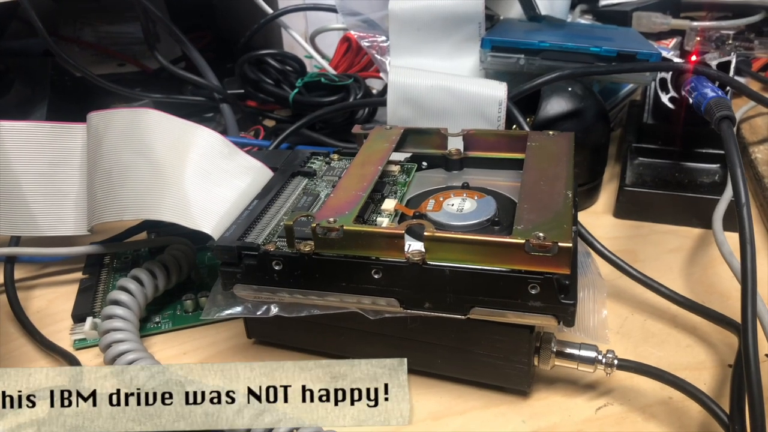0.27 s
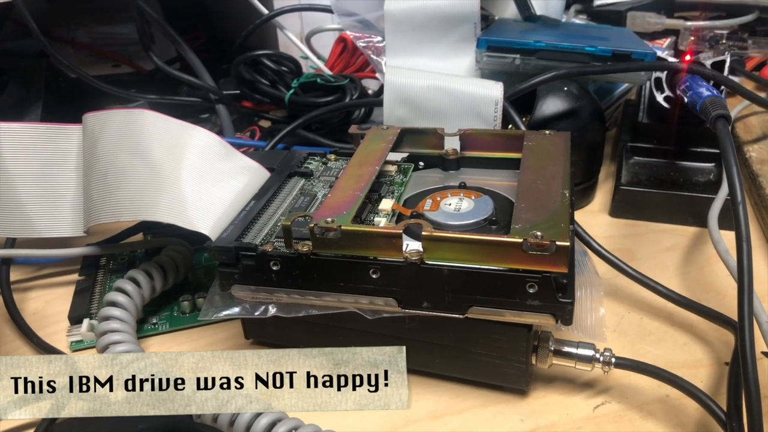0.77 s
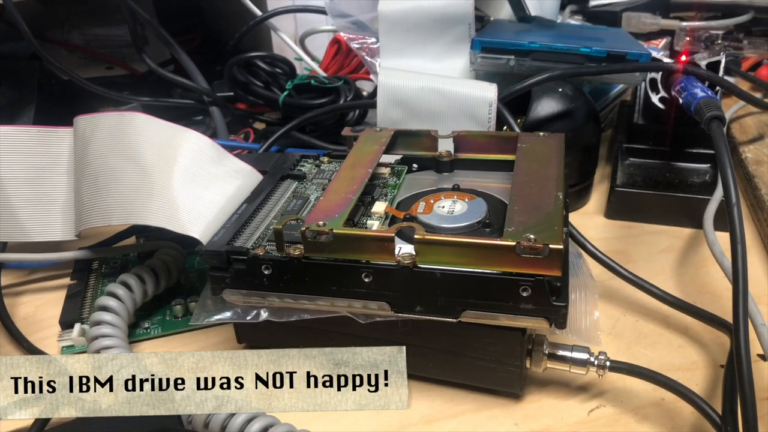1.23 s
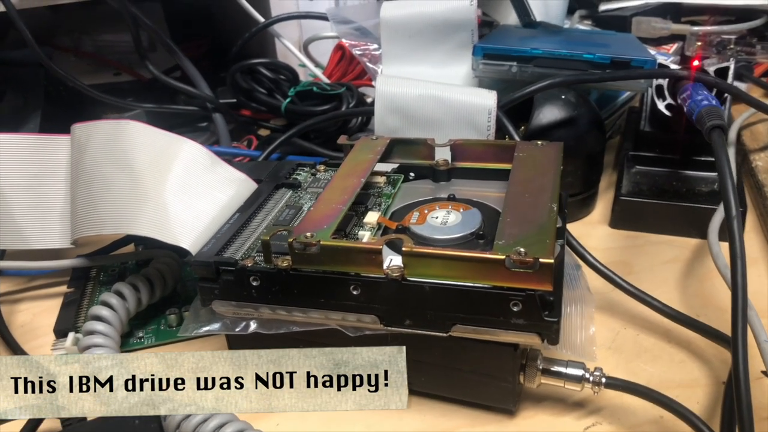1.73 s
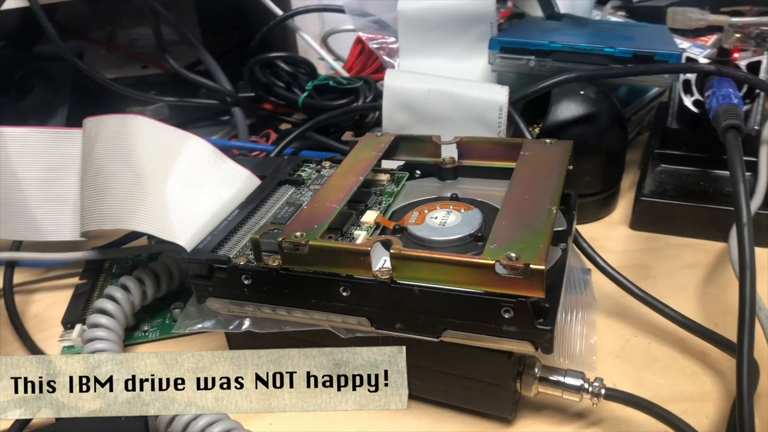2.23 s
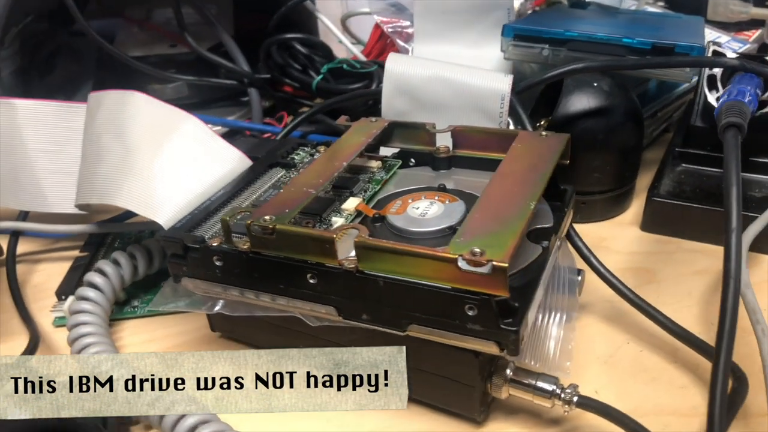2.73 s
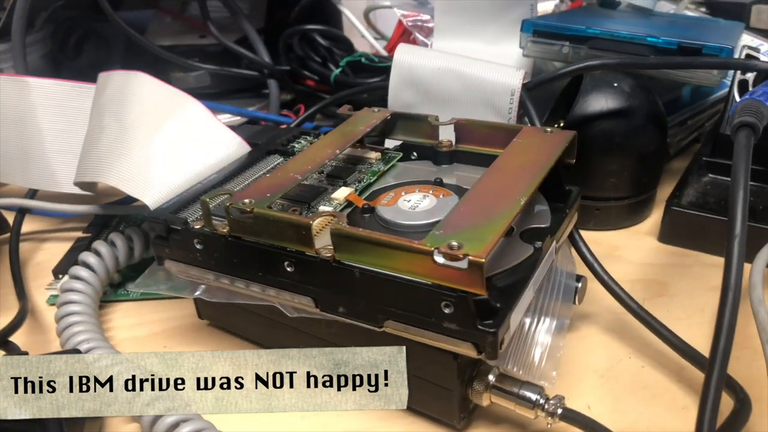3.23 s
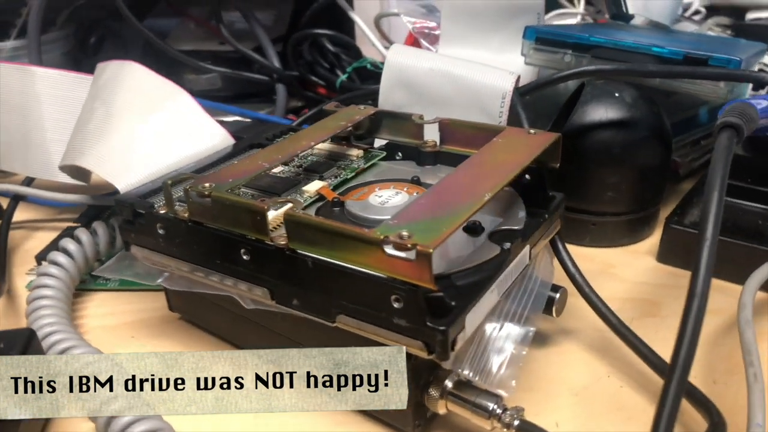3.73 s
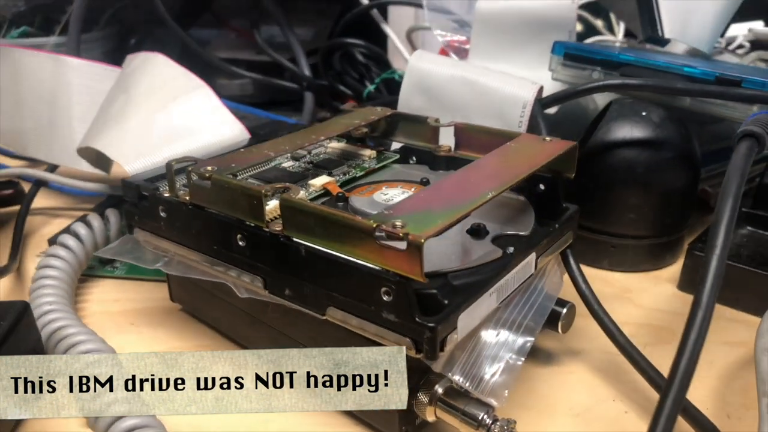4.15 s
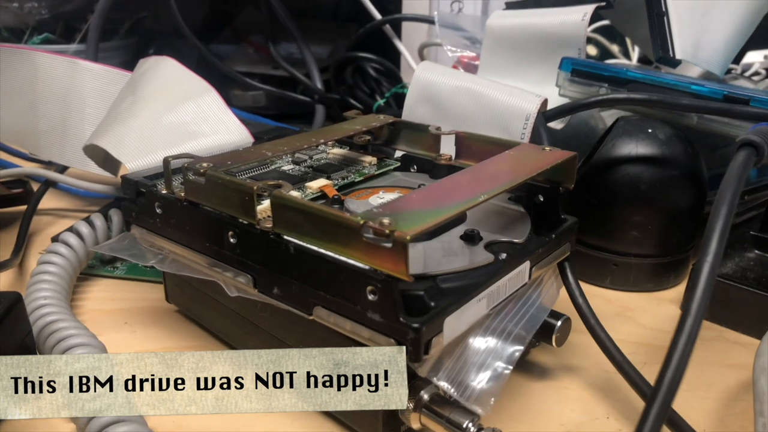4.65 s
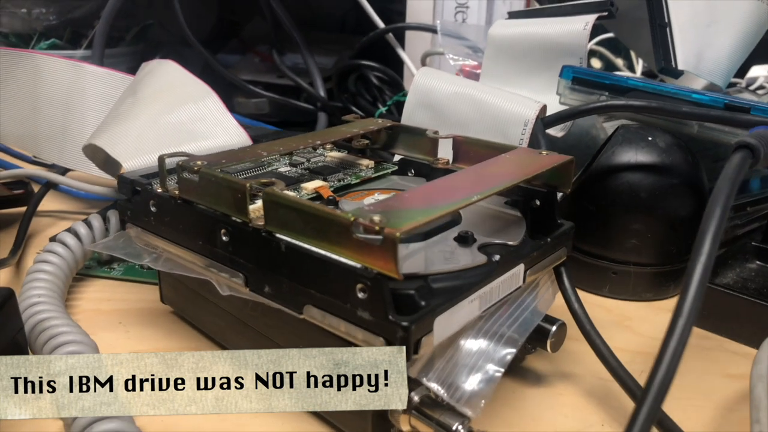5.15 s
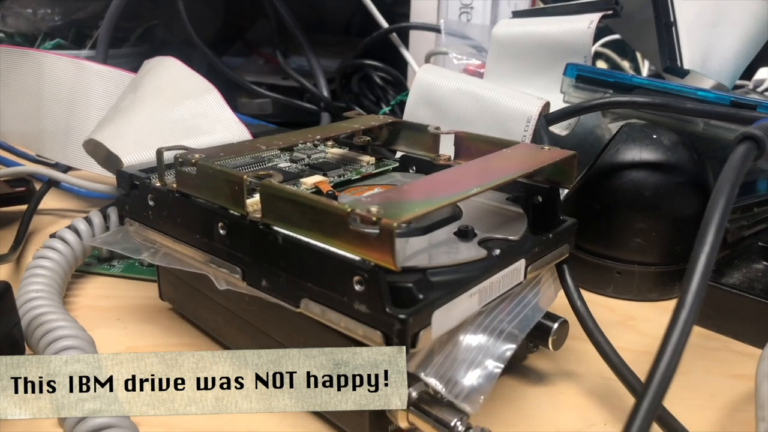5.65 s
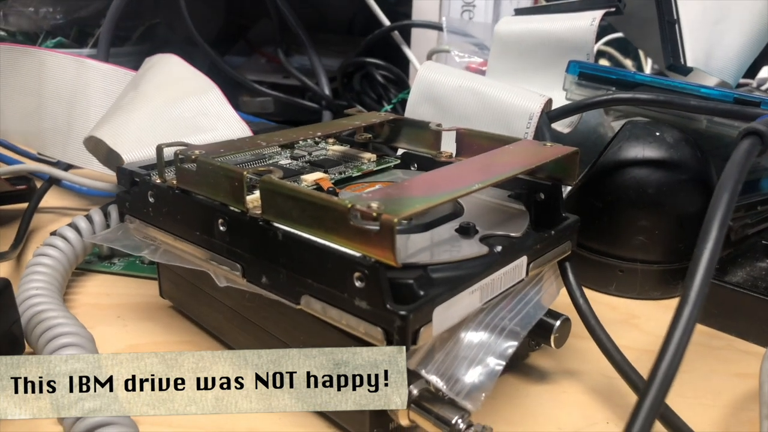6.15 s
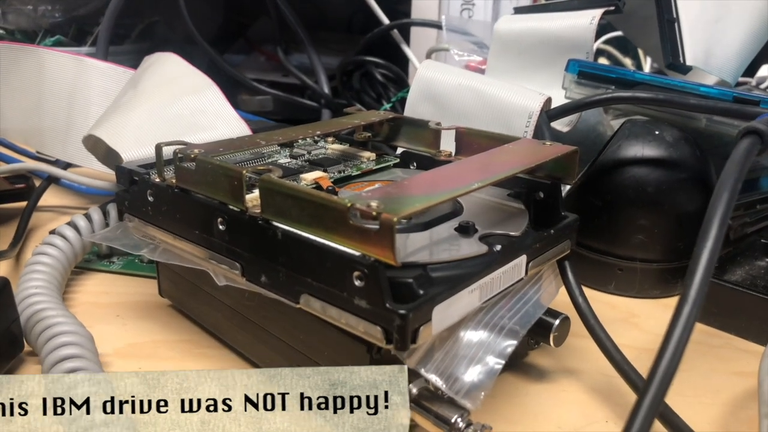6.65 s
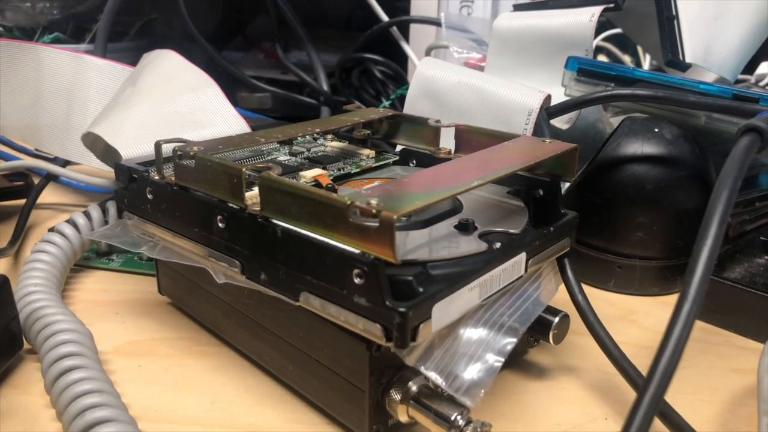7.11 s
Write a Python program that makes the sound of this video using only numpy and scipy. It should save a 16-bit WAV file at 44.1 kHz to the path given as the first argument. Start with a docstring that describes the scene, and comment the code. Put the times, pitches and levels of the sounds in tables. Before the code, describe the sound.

A faulty, uncovered hard drive runs close to the microphone on a bench in a small room with little echo. A thin spindle whine and airy platter whirr continue for the whole seven and a half seconds, the whine strongest at first and shifting in tone as the microphone moves. Over this, the head arm buzzes in short, irregular bursts that faintly ring the metal frame. It hits its stop with hard, bright clacks at about 0.2, 0.4, 1.5 and 4.3 seconds, and with softer, bouncing clicks roughly every 0.6 to 0.8 seconds elsewhere. The head also scrapes the platter in brief gritty hisses, often ending in sharp ticks, clearest at the very start and near 1.4, 2.5, 4.5, 5.2, 5.8 and 6.4 seconds. The buzzing turns slightly duller after about 3.3 seconds, and the uneven rattling carries on to the end.

```python
"""The head arm of a failing hard drive buzzes through bursts of short seeks, driven by its coil, and
slams against its stop and bounces, over and over. The head scrapes and chips at the platter; arm, head
and bearings shake the metal frame. Behind them the spindle whines and the platters whirr in the air.
The cover is off, the drive sits on a cluttered bench in a small room, the microphone moves close by."""
import sys
import numpy as np
from scipy import signal
from scipy.fft import rfft, irfft, next_fast_len
from scipy.io import wavfile
from scipy.ndimage import uniform_filter1d

SR = 44100
rng = np.random.default_rng(int(sys.argv[2]) if len(sys.argv) > 2 else 0)


def log_audio(samples):
    """Write samples as a 16-bit WAV file to the path given in sys.argv[1]."""
    # one column per channel
    frames = np.atleast_2d(samples).T
    # limit to full scale, then quantise
    limited = np.clip(frames, -1, 1)
    pcm = np.round(limited * 32767).astype(np.int16)
    wavfile.write(sys.argv[1], SR, pcm)


N = 325325
TIME_S = np.arange(N) / SR

# runs of short seeks: start_s, length_s, level_db, upper_modes_db, shake_db
SEEK_RUNS = [(0.032, 0.08, -34.5, -0.5, -33.5), (0.549, 0.11, -35, 3.5, -30.5),
             (0.671, 0.055, -31.5, 3.5, -32.5), (0.748, 0.022, -28, -0.5, -31),
             (1.056, 0.01, -40, -13, -39), (1.085, 0.055, -31, -6, -31.5), (1.216, 0.055, -30.5, -1.5, -37),
             (1.283, 0.145, -31.5, 1, -31), (1.712, 0.01, -34.5, 1, -40), (1.856, 0.02, -34, 3, -32.5),
             (1.9, 0.05, -34, 2, -37), (1.97, 0.055, -43, 3, -44), (2.032, 0.01, -34.5, 1, -38),
             (2.343, 0.022, -32, -13, -33), (2.503, 0.18, -36.5, 4.5, -37.5), (2.96, 0.02, -40, -14, -32),
             (3.032, 0.02, -37, -10, -38), (3.102, 0.078, -28.5, -2, -36.5), (3.194, 0.033, -34, 0, -30.5),
             (3.244, 0.01, -35, -8, -44), (3.265, 0.03, -33.5, -14, -32.5), (3.626, 0.044, -35, -12, -37),
             (3.727, 0.088, -31, -16, -36), (3.837, 0.078, -36.5, -9, -40.5),
             (4.374, 0.01, -31.5, -24, -35), (4.394, 0.02, -35.5, -20, -34.5),
             (4.467, 0.033, -36, -18, -34), (4.5055, 0.044, -27.5, -17, -31),
             (4.558, 0.033, -34.5, -13, -42), (4.592, 0.055, -31.5, -16, -35.5),
             (4.668, 0.033, -33.5, -14, -37.5), (4.974, 0.022, -32.5, -20, -33),
             (5.025, 0.02, -37, -18, -35.5), (5.114, 0.165, -33, -15, -36), (5.301, 0.01, -31.5, -13, -41),
             (5.602, 0.022, -35.5, -19, -34), (5.671, 0.01, -38, -17, -38), (5.744, 0.185, -32.5, -12, -39),
             (6.19, 0.01, -31, -22, -36), (6.212, 0.01, -33, -24, -36), (6.24, 0.01, -35, -22, -33),
             (6.267, 0.01, -34.5, -22, -33), (6.359, 0.19, -34.5, -9, -38.5), (6.919, 0.01, -36, -17, -32),
             (6.953, 0.01, -31, -19, -32), (6.985, 0.088, -31.5, -9, -38.5),
             (7.106, 0.033, -29.5, -15, -34)]
# single hard throws of the arm: start_s, length_s, level_db
ARM_JOLTS = [(0.4176, 0.0048, -24.5), (0.722, 0.0051, -29), (1.064, 0.0096, -22), (1.691, 0.0061, -26.5),
             (2.336, 0.0036, -24.5), (2.9466, 0.0087, -22.5), (3.5747, 0.0083, -27.5),
             (3.5983, 0.0032, -27.5), (3.7184, 0.0025, -25), (3.9227, 0.006, -29), (4.336, 0.0072, -27.5),
             (4.6275, 0.0051, -27), (4.962, 0.013, -29), (5.004, 0.0033, -27.5), (5.136, 0.0059, -27),
             (5.5797, 0.0088, -28.5), (6.1983, 0.0072, -22.5), (6.805, 0.011, -29.5), (7.099, 0.006, -26)]
# blows on the stop: start_s, level_db, bounce_after_s
STOP_BLOWS = [(0.1655, -11.5, .01), (0.3669, -14.5, .01), (0.406, -22, .012), (0.87, -23, 0.012),
              (1.4862, -13, .01), (1.6232, -20.5, .011), (2.1332, -24.5, 0.011), (2.7812, -22, 0.0091),
              (3.5084, -20, 0.01), (4.3043, -11, .01), (4.8037, -22, .0086), (5.4296, -21.5, .0103),
              (6.0326, -20, .014), (6.6436, -21.5, .01), (7.2592, -22.5, .01)]
# head drags; most crest in a sharp strike, some are only a soft hiss:
# peak_s, drag_s, hiss_db, grit_db, strike_db
HEAD_DRAGS = [(0.0076, 0.0075, -25, -38, -11.5), (0.1078, 0.03, -27, -37, -19),
              (0.127, 0.007, -30.5, -29, -16), (0.337, 0.022, -34, -45, -42),
              (0.557, 0.006, -27.5, -46, -23.5), (0.625, 0.006, -32, -37, -34),
              (1.254, 0.039, -36, -37, -32), (1.373, 0.013, -31, -40, -14.5),
              (1.3817, 0.008, -27, -38, -9.5), (1.587, 0.007, -33, -60, -56), (1.86, 0.037, -37, -44, -38),
              (1.955, 0.014, -36.5, -39, -38), (2.4925, 0.0099, -36, -44, -22),
              (2.5027, 0.008, -30.5, -39, -13), (3.1755, 0.017, -30.5, -44, -17.5),
              (3.2831, 0.014, -39, -39, -22.5), (3.383, 0.008, -36.5, -56, -55),
              (3.471, 0.007, -33, -58, -60), (3.752, 0.032, -35.5, -35, -19.5),
              (3.798, 0.004, -42, -43, -22.5), (3.953, 0.053, -41, -45, -37), (4.273, 0.023, -35, -43, -62),
              (4.495, 0.021, -34.5, -30.5, -20), (4.5185, 0.011, -29, -39, -16.5),
              (4.539, 0.011, -42, -42, -23), (4.593, 0.004, -43, -41, -15),
              (4.6717, 0.003, -48, -50, -22.5), (5.1373, 0.032, -39.5, -36, -20),
              (5.184, 0.0044, -31, -42, -14.5), (5.258, 0.007, -38, -46, -17),
              (5.302, 0.0077, -41, -53, -23), (5.7416, 0.021, -33, -32.5, -24),
              (5.7787, 0.003, -43, -45, -22), (5.8007, 0.004, -40, -42, -16),
              (5.8144, 0.012, -44, -39, -20), (5.9017, 0.012, -38, -38, -22),
              (6.3565, 0.019, -34.5, -29, -12), (6.404, 0.007, -33.5, -43, -24),
              (6.975, 0.022, -34, -32, -28), (7.0313, 0.003, -48, -48, -23),
              (7.0526, 0.0063, -38, -43, -16.5), (7.099, 0.006, -42, -44, -18.5)]
# microphone path round the drive: time_s, place, whirr_db
MIC_PATH = [(0, 0, 3.5), (1.5, 0.26, 1.5), (1.85, 1, 1), (2.3, 0.6, 0), (3.2, 2, 0), (4.1, 2.5, 0.05),
            (5.5, 4.5, 0.5), (7.4, 3, -1)]

# arm bending modes and frame modes: pitch_hz, width_hz, place0_db, place3_db
ARM_MODES = [(3944, 185, -2, -10), (4152, 148, 0, -0.5), (4600, 236, -9.5, -.5)]
FRAME_MODES = [(1467, 26.6, -3, -14.5), (1754, 66, -12, -5.5), (1937, 37, -4, -10.5), (2193, 72, -6, -7),
               (2605, 320, -12, -8), (2803, 36.4, 8, 6), (3113, 94, -8, -7), (3403, 103, -.5, 3.5),
               (3505, 16.5, 3.5, 3)]
# resonances of each part: pitch_hz, width_hz, gain_db
ARM_UPPER_MODES = [(4600, 570, -2.5), (5330, 530, -3), (6100, 290, -24)]
SUSPENSION_MODES = [(6330, 2100, 4.5), (7570, 260, -9), (8560, 340, 14.5), (9850, 340, -9)]
STOP_LOW_MODES = [(3680, 76, 2), (4050, 134, 16.8), (4745, 130, 13)]
STOP_HIGH_MODES = [(5440, 470, 3.5), (6150, 336, 5), (7360, 130, -2), (8420, 190, 4.5), (9640, 420, -7)]
HEAD_MODES = [(6590, 730, 1), (7380, 350, -1.5), (8080, 350, -0.5), (9200, 700, 1.5), (10600, 1200, 0.5),
              (11380, 780, 5), (14000, 1800, -12), (14800, 90, 1), (15900, 430, -2)]
CASING_MODES = [(5230, 62, 2), (5470, 33, -3), (5960, 29, -4), (6340, 32, -15), (6580, 36, -6),
                (7520, 100, 4.5), (7970, 45, 2), (8250, 45, 2), (9400, 41, 0), (10500, 32, -9),
                (13000, 26, -13), (14600, 33, -8)]
# spindle, motor and bearing tones: pitch_hz, place0_db, place1_db, place2_db
SPINDLE_TONES = [(377, -59, -62, -65), (587, -56, -57, -59), (673, -65, -68, -73), (861, -65, -75, -70),
                 (1007, -62, -63, -65), (1179, -68, -70, -70), (1346, -68, -69, -68), (1750, -65, -66, -61),
                 (1943, -56, -65, -70), (2511, -62, -61, -58), (2566, -63, -68, -65), (2621, -67, -65, -57),
                 (2646, -53, -62, -66), (2666, -67, -62, -61), (2890, -41, -56, -52), (3005, -79, -69, -62),
                 (3059, -56, -58, -56), (3113, -69, -68, -61), (3499, -52, -55, -58), (3507, -56, -60, -58),
                 (3900, -72, -60, -65), (3930, -60, -62, -60), (5297, -69, -63, -67), (5416, -64, -68, -62),
                 (6169, -66, -73, -70), (6608, -67, -67, -62), (7477, -62, -70, -66), (7801, -68, -65, -63),
                 (9561, -63, -72, -71)]
# spectra of drag hiss and platter air: frequency_hz, gain_db
HISS_SPECTRUM = [(1500, -69), (3300, -10), (4100, 6.5), (5000, -1), (6400, -1), (7600, -5), (8600, -2),
                 (10000, -9), (16000, -23)]
AIR_SPECTRUM = [(25, -52), (60, -23), (120, -12), (220, -1.5), (450, -3.5), (650, 2), (850, -8), (1400, -6),
                (2100, -4), (2750, 3), (4300, -9.5), (8000, -10), (12000, -17.5), (16000, -23.5)]

RUN_SQUEAL_DB, JOLT_SQUEAL_DB = -12.5, -9.5  # servo tone over servo noise


def arm_seeks(place, edge_s=0.0015, lead_s=0.0014, squeal_hz=4130, shake_s=0.006):
    """Pulses of coil force set the arm buzzing; returns the buzz and the power fed to the frame."""
    out, shake, t = np.zeros(N), np.zeros(N), TIME_S[:2000]
    plan = seek_plan()
    starts_s, lengths_s, *_, squeals_db = np.transpose(plan)[:, :, None]
    seek_place = np.interp(starts_s, TIME_S, place)
    force = np.clip(np.minimum(t, lengths_s + edge_s - t) / edge_s, 0, 1)
    # the servo hunts near the arm's resonance
    hunt_hz = squeal_hz * (1 + 0.0093 * rng.standard_normal((len(plan), 1)))
    squeal = undb(squeals_db) * np.sin(2 * np.pi * hunt_hz * t)
    push = force * (rng.standard_normal(force.shape) + squeal)
    bending = band(ring_at(push, ARM_MODES, seek_place), 3200, 5400)
    upper = band(ring(push, ARM_UPPER_MODES), 4800, 6700)
    suspension = band(ring(push, SUSPENSION_MODES), 6340, 9560)
    for k, (start_s, _, level_db, upper_db, shake_db, squeal_db) in enumerate(plan):
        # more squeal, less noise into the suspension
        suspension_db = -18 + 2.5 * seek_place[k] + RUN_SQUEAL_DB - squeal_db
        buzz = undb(3) * crest(bending[k]) + undb(upper_db) * crest(upper[k])
        buzz += undb(suspension_db) * crest(suspension[k])
        add(out, start_s - lead_s, undb(level_db) * buzz)
        add(shake, start_s - lead_s, undb(shake_db) ** 2 * np.exp(-(t / shake_s) ** 2))
    return out, shake


def seek_plan(turn_hz=90.6, seek_s=0.0062, jitter_s=0.0016, jolt_upper_db=-23, jolt_shake_db=-5.5):
    """Jolts, and a seek per platter turn in runs: start_s, length_s, level/upper/shake/squeal_db."""
    plan = [(start_s, length_s, level_db, jolt_upper_db, level_db + jolt_shake_db, JOLT_SQUEAL_DB)
            for start_s, length_s, level_db in ARM_JOLTS]
    scatter = rng.standard_normal((len(SEEK_RUNS), 20, 4))
    for (run_start_s, run_s, level_db, upper_db, shake_db), draws in zip(SEEK_RUNS, scatter):
        turns = max(round(run_s * turn_hz), 1)
        for turn, (late, longer, louder, shakier) in enumerate(draws[:turns]):
            wander = min(turn, 1)  # a run starts cleanly, then the servo wanders
            start_s = run_start_s + turn / turn_hz + wander * jitter_s * late
            length_s = seek_s * np.exp(0.19 * longer)
            plan.append((start_s, length_s, level_db + 2 * wander * louder,
                         upper_db, shake_db + 3 * wander * shakier, RUN_SQUEAL_DB))
    return plan


def stop_clacks(contact_s=0.0009, chatter_s=0.00093, bounce_db=-5, bounce_below_db=-16):
    """The arm hits its stop with a brief chatter; hard blows ring brighter, and a bounce is heard only after
    the softer blows."""
    out, t = np.zeros(N), TIME_S[:1500]
    blows = [(start_s, level_db) for start_s, level_db, _ in STOP_BLOWS]
    blows += [(start_s + flight_s, level_db + bounce_db)
              for start_s, level_db, flight_s in STOP_BLOWS if level_db < bounce_below_db]
    chatter = undb(-3) * np.exp(-t / chatter_s) * np.minimum(t / contact_s, 1) ** 2
    force = chatter * rng.standard_normal((len(blows), len(t)))
    force[:, int(contact_s * SR)] += 1  # the blow itself
    low = band(ring(force, STOP_LOW_MODES), 3600, 6500)
    high = band(ring(force, STOP_HIGH_MODES), 3600, 11600)
    for k, (start_s, level_db) in enumerate(blows):
        hardness = undb(0.62 * (level_db + 24))
        clack = undb(-1) * crest(low[k]) + hardness * crest(high[k])
        add(out, start_s, undb(level_db) * clack / np.hypot(1, hardness))
    return out


def head_scrapes(hiss_s=0.018, grit_s=0.0087, shake_s=0.012):
    """The dragging head hisses and rings with gritty slips; also returns the power fed to the frame."""
    powers, t = np.zeros((3, N)), TIME_S[:SR // 4]
    for peak_s, drag_s, hiss_db, grit_db, strike_db in HEAD_DRAGS:
        shake_db = 0.55 * hiss_db + 0.45 * strike_db - 4.5
        rise = np.minimum(t / drag_s, 1) ** 0.78
        for power, db, fade_s in zip(powers, (hiss_db, grit_db, shake_db), (hiss_s, grit_s, shake_s)):
            fade = np.exp(-np.maximum(t - drag_s, 0) / fade_s)
            add(power, peak_s - drag_s, (undb(db) * rise * fade) ** 2)
    hiss_power, grit_power, shake = powers
    hiss = undb(0.5 * drift(260)) * colour(rng.standard_normal(N), HISS_SPECTRUM)
    slips = rng.standard_normal(N) * undb(3 * rng.exponential(size=N) + 2 * drift(260))
    grit = undb(-1) * unit(band(ring(slips, HEAD_MODES), 6900))
    return np.sqrt(hiss_power) * hiss + np.sqrt(grit_power) * grit, shake


def head_strikes(contact_s=0.0012, skip_s=0.0077, skip_db=-9.5, gain_db=-4):
    """At the peak of most drags the head chips at the platter, then skips twice, weaker each time."""
    out, t, hits = np.zeros(N), TIME_S[:900], []
    scatter = rng.uniform(-1, 1, (len(HEAD_DRAGS), 2, 2))
    for (start_s, *_, level_db), skips in zip(HEAD_DRAGS, scatter):
        hits.append((start_s, level_db))
        for late, louder in skips:
            start_s += skip_s * (1 + 0.5 * late)
            level_db += skip_db + 4 * louder
            hits.append((start_s, level_db))
    contact = rng.standard_normal((len(hits), len(t))) * np.sqrt(t) * np.exp(-t / contact_s)
    chips = band(ring(contact, HEAD_MODES), 3200)
    for (start_s, level_db), chip in zip(hits, chips):
        add(out, start_s, undb(level_db + gain_db) * crest(chip, window_samples=70))
    return out


def frame_ring(shake, place, gain_db=16):
    """Arm, head and bearings shake the metal frame."""
    bearing = undb(-47 - 11.5 * np.minimum(place, 1))
    force = band(rng.standard_normal(N), 1250, 5200) * np.sqrt(shake + bearing ** 2)
    return undb(gain_db) * ring_at(force, FRAME_MODES, place)


def spindle_whine(place, gain_db=1):
    """Spindle and bearing tones flutter slightly, and swell and fade as the microphone moves."""
    out = np.zeros(N)
    speed = 1 + 0.000201 * drift(1.99)
    for pitch_hz, *place_db in SPINDLE_TONES:
        level_db = np.interp(place, [0, 1, 2], place_db) + drift(2.74) + drift(30)
        wobbling_hz = pitch_hz * (speed + 0.00031 * drift(40))
        phase = 2 * np.pi * np.cumsum(wobbling_hz) / SR
        out += undb(level_db + gain_db) * np.sqrt(2) * np.sin(phase)
    return out


def platter_whirr(gain_db, air_db=-44.5, casing_db=-55, cavity_t60_s=0.1):
    """Air dragged round by the platters; its treble rings in the open casing."""
    t, flow = TIME_S[:SR // 4], rng.standard_normal(N)
    cavity = rng.standard_normal(len(t)) * undb(-60 * t / cavity_t60_s)
    treble = signal.fftconvolve(band(flow, 4730), cavity / np.linalg.norm(cavity))[:N]
    air = undb(air_db) * colour(band(flow, 15, 6300) + treble, AIR_SPECTRUM)
    casing = undb(casing_db) * unit(band(ring(rng.standard_normal(N), CASING_MODES), 5000, 15300))
    return (air + casing) * undb(gain_db + 0.5 * drift(9.3))


def room(x, bench_db=-12, bench_t60_s=0.073, room_db=-15, room_t60_s=0.24):
    """Add quick reflections off the bench clutter and the short tail of the room."""
    t = TIME_S[:SR // 2]
    response = np.zeros(len(t))
    for level_db, t60_s in ((bench_db, bench_t60_s), (room_db, room_t60_s)):
        tail = rng.standard_normal(len(t)) * undb(-60 * t / t60_s) * (t > 0.002)
        response += undb(level_db) * tail / np.linalg.norm(tail)
    return x + signal.fftconvolve(x, response)[:N]


def ring(x, modes):
    """Drive resonances; neighbours swing in opposite sense."""
    return sum((-1) ** k * undb(db) * signal.lfilter(*signal.iirpeak(hz, hz / width_hz, fs=SR), x)
               for k, (hz, width_hz, db) in enumerate(modes))


def ring_at(x, modes, place):
    """Resonances that beam differently to microphone places 0 and 3."""
    first = ring(x, [(hz, width_hz, db) for hz, width_hz, db, _ in modes])
    last = ring(x, [(hz, width_hz, db) for hz, width_hz, _, db in modes])
    return first + (last - first) * np.clip(place / 3, 0, 1)


def band(x, low_hz, high_hz=0.45 * SR):
    """Steep band-pass."""
    return signal.sosfilt(signal.butter(4, [low_hz, high_hz], "band", fs=SR, output="sos"), x)


def colour(x, spectrum):
    """Shape x with a smooth spectrum; rms 1."""
    hz, db = np.transpose(spectrum)
    size = next_fast_len(N)
    bins_hz = np.maximum(np.fft.rfftfreq(size, 1 / SR), 1)
    gain = undb(np.interp(np.log(bins_hz), np.log(hz), db))
    return unit(irfft(rfft(x, size) * gain, size)[:N])


def drift(rate_hz):
    """Smooth random curve, spread near 1."""
    hold = int(SR / rate_hz)
    steps = np.repeat(rng.standard_normal(N // hold + 1), hold)
    return 1.186 * uniform_filter1d(steps, hold)[:N]


def undb(db):
    """Decibels to gain."""
    return 10 ** (np.asarray(db) / 20)


def unit(x):
    """Scale to rms 1."""
    return x / np.sqrt(np.mean(x ** 2))


def crest(x, window_samples=176):
    """Scale the loudest window to rms 1."""
    return x / np.sqrt(uniform_filter1d(x ** 2, window_samples, mode="constant").max())


def add(out, start_s, x):
    """Mix x into out at start_s."""
    i = int(round(start_s * SR))
    x, i = x[max(-i, 0):], max(i, 0)
    out[i:i + len(x)] += x[:max(N - i, 0)]


def scene():
    """Arm, head and frame rattle in the room, over spindle and platters."""
    path_s, places, whirr_db = np.transpose(MIC_PATH)
    place = np.interp(TIME_S, path_s, places)
    buzz, seek_shake = arm_seeks(place)
    drag, drag_shake = head_scrapes()
    rattle = buzz + drag + stop_clacks() + head_strikes() + frame_ring(seek_shake + drag_shake, place)
    mix = room(rattle) + spindle_whine(place) + platter_whirr(np.interp(TIME_S, path_s, whirr_db))
    return mix[None]


def record(dry, ceiling=0.8, low_hz=35, top_hz=15800):
    """Round the highest peaks; cut the deepest bass and the top."""
    rounded = dry / (1 + (dry / ceiling) ** 4) ** 0.25
    bass_cut = signal.sosfilt(signal.butter(1, low_hz, "high", fs=SR, output="sos"), rounded)
    return signal.sosfilt(signal.ellip(10, 0.2, 70, top_hz, fs=SR, output="sos"), bass_cut)


dry = scene()
out = record(dry)
log_audio(out)
```